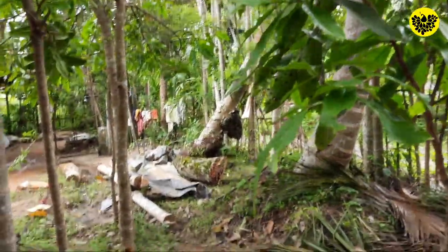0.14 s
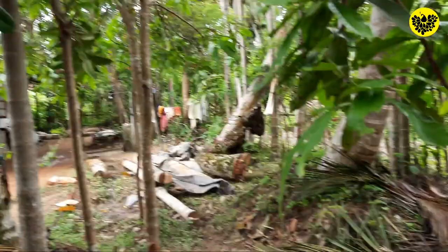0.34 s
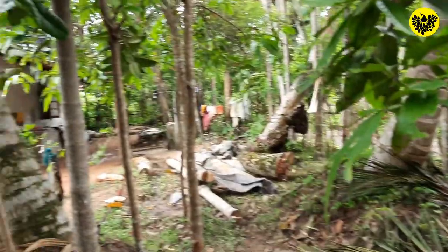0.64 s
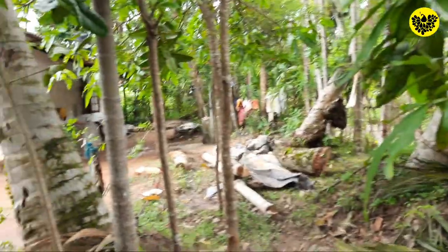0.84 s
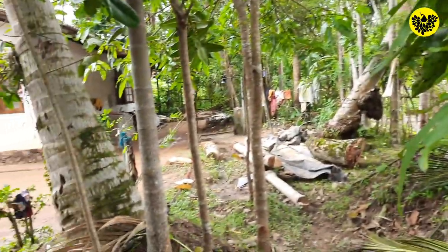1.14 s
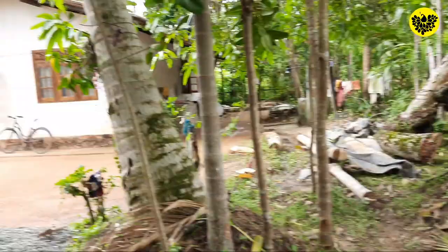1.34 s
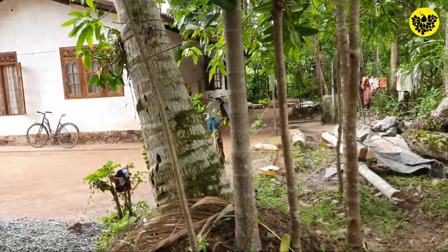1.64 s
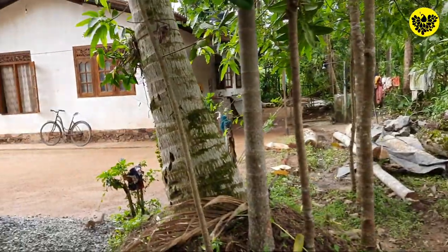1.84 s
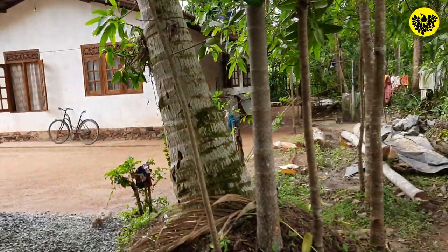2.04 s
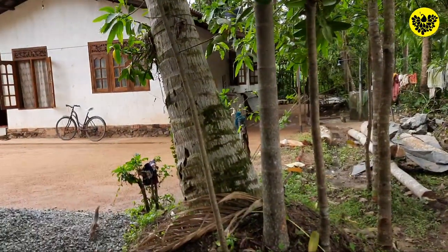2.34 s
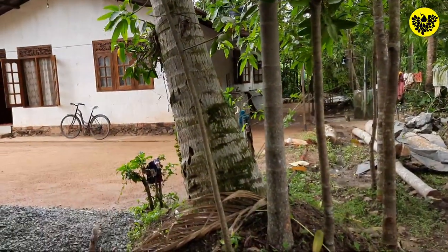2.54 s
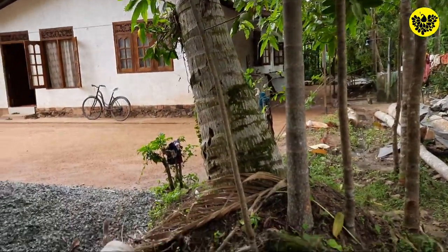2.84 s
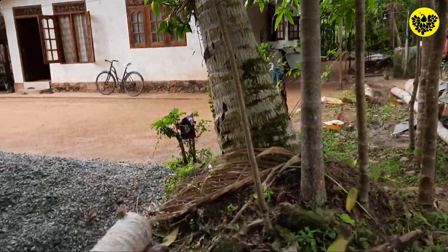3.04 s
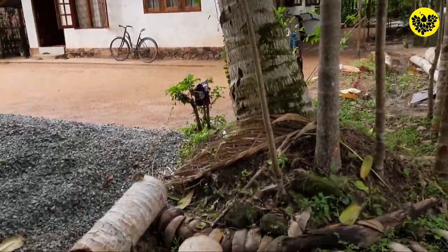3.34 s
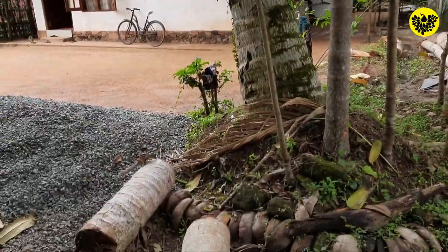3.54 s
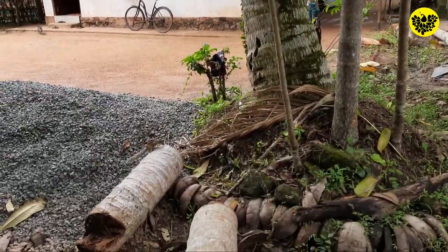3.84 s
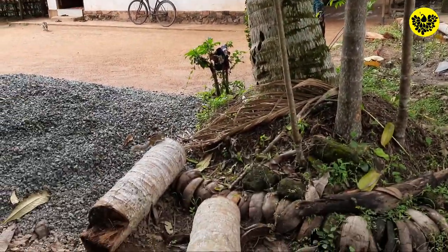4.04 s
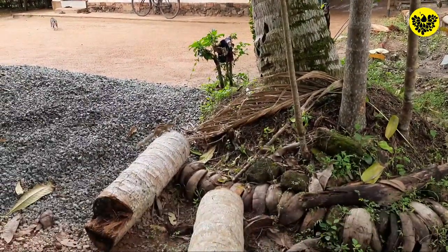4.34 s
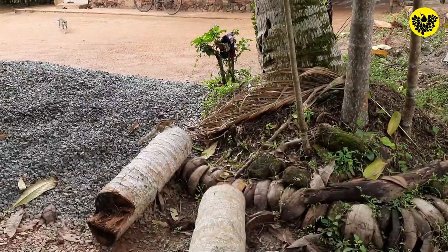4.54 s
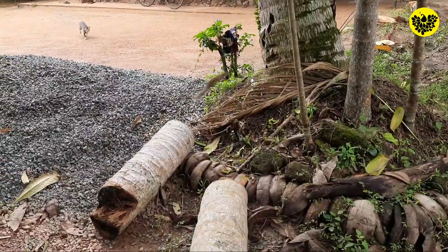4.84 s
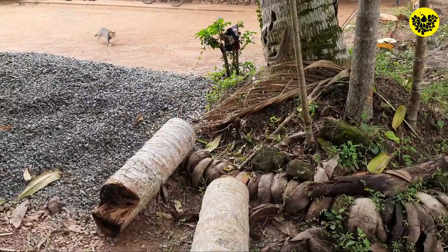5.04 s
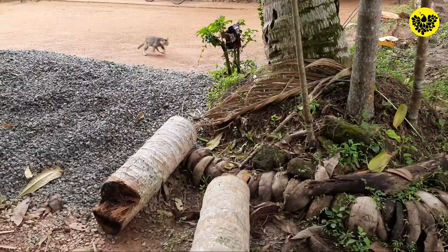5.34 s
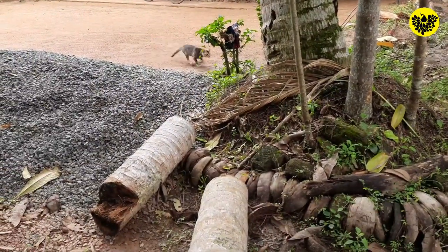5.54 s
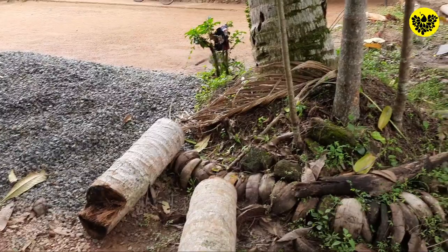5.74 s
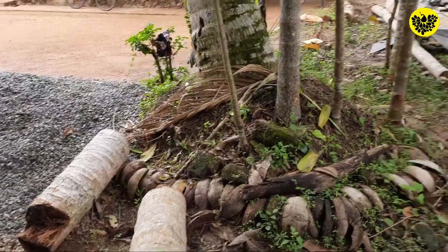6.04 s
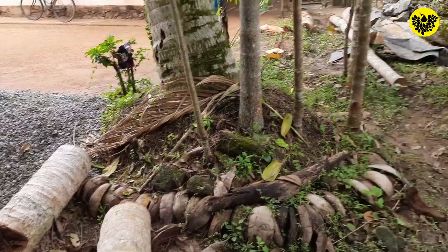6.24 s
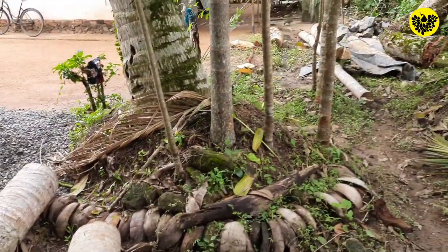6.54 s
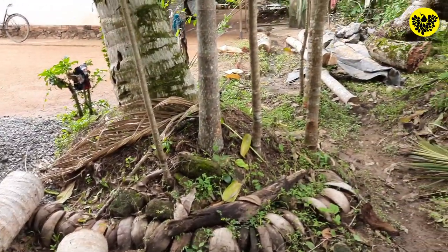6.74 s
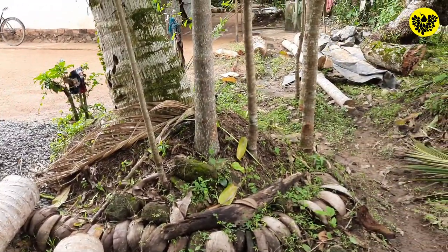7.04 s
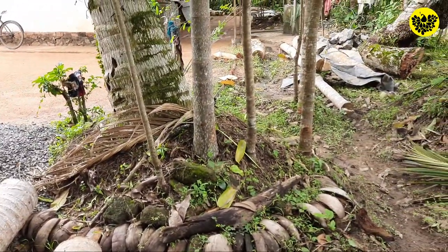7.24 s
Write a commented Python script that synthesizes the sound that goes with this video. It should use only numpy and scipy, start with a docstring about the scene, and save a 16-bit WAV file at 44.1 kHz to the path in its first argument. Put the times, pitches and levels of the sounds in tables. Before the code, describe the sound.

Faint wind, an insect whine and far birdsong, then a squirrel breaks into high-pitched chipping calls outdoors.

```python
"""A wooded yard: low wind rumble, insects, far birds, a row of soft chucks and a few bumps on the phone.
Then a palm squirrel breaks into shrill alarm chips; near the end its voice splits into two pitches.
Each chip is an arched whistle that snaps downward at its end and scatters off the house wall and trunks.
Birdsong is thin gliding sine tones; wind, leaves, insects and hoarse calls are shaped noise."""
import sys
import numpy as np
from scipy import signal
from scipy.fft import rfft, irfft
from scipy.io import wavfile
from scipy.ndimage import uniform_filter1d

SR = 44100
rng = np.random.default_rng(int(sys.argv[2]) if len(sys.argv) > 2 else 0)


def dump_mix(stems):
    """Bounce the given channels to the path in sys.argv[1] as a 16-bit WAV at rate SR."""
    frames = np.atleast_2d(stems).T  # one column per channel
    limited = np.clip(frames, -1, 1)  # hard clip at full scale
    pcm = np.round(limited * 32767).astype(np.int16)
    wavfile.write(sys.argv[1], SR, pcm)


N = 325899
T = np.arange(N) / SR


def undb(db):
    """Decibels to gain."""
    return 10 ** (np.asarray(db) / 20)


def unit(x):
    """Scale to rms 1."""
    return x / np.sqrt(np.mean(x ** 2))


def pan(x, db):
    """Place a sound by its left minus right level."""
    return x * undb(np.array([[db], [-db]]) / 2)


def add(out, s, x):
    """Mix x into out from time s."""
    i = int(s * SR)
    out[..., i:i + x.shape[-1]] += x[..., :max(N - i, 0)]


def walk(rate, size=N):
    """Smooth random wander with spread near 1."""
    k = max(int(SR / rate), 1)
    held = np.repeat(np.random.default_rng(rng.integers(2 ** 31)).standard_normal(size // k + 3), k)
    return 1.56 * uniform_filter1d(uniform_filter1d(held, k), k)[k:k + size]


def band(hz, width_hz, size=N):
    """Stereo noise in one resonance, rms 1."""
    f = np.fft.rfftfreq(size, 1 / SR)
    return unit(irfft(rfft(rng.standard_normal((2, size))) / (1 + ((f - hz) / width_hz) ** 2), size))


def on_log(f, points):
    """Read (Hz, value) points on a log-frequency axis."""
    hz, value = np.transpose(points)
    return np.interp(np.log(f + 1), np.log(hz), value)


def puff(rise_s):
    """A half-second envelope that peaks after rise_s and dies away."""
    t = T[:SR // 2] / rise_s
    return (t * np.exp(1 - t)) ** 2


def series(start_s, end_s, gap_s, growth_s):
    """Times of a run of calls whose gap changes steadily."""
    times, gap = [start_s], gap_s
    while times[-1] + gap < end_s:
        times.append(times[-1] + gap)
        gap = max(gap + growth_s, gap_s / 2)
    return times


def ports(x, lag_samples=1):
    """Sound from the side reaches the right microphone just after the left."""
    return np.array([x[0], np.roll(x[1], lag_samples)])


def yard(x, near_db, far_db, near_t60, far_t60, count=40, treble_hz=7000, treble_t60=0.62):
    """Echoes only: a quick scatter from ground, wall and trunks, then a soft tail from the foliage."""
    t = T[:SR]
    noise = rng.standard_normal((2, SR))
    # leaves and air give the treble its own decay time
    body = signal.sosfiltfilt(signal.butter(3, treble_hz, fs=SR, output="sos"), noise)
    tail = body * undb(-60 * t / far_t60) + (noise - body) * undb(-60 * t / treble_t60)
    tail *= 1 - np.exp(-t / 0.017)
    trunks = np.zeros((2, SR))
    for side in trunks:
        lag = .002 + .06 * (np.arange(count) + rng.random(count)) / count
        side[(lag * SR).astype(int)] = rng.choice([-1, 1], count) * undb(-60 * lag / near_t60)
    response = (undb(near_db) * unit(trunks) + undb(far_db) * unit(tail)) / np.sqrt(SR)
    return signal.fftconvolve(x, response, axes=1)[:, :N]


def wind(gain_db=8, rumble_hz=70, rumble_db=-54, flicker_db=1.27):
    """A bed of wind and far-off rumble: octave bands follow the breeze and each flickers on its own."""
    # tone of wind and distance: (frequency [Hz], relative level [dB])
    colour = [(25, -32.5), (58, -3), (120, 1.5), (165, -14.5), (363, -11), (700, -18.5), (1520, -21),
              (2300, -23), (3300, -33), (5730, -35.5), (7110, -28.5), (8140, -46), (11000, -48),
              (15000, -58)]
    # strength of the breeze: (time [s], relative level [dB])
    breeze = [(0, -53), (.6, -54.5), (4.95, -54), (5.8, -56.5), (6.8, -52.5), (7.39, -50)]
    # stereo image, centred bass and wide treble: (frequency [Hz], left-right correlation [-1..1])
    likeness = [(60, 0.96), (170, 0.98), (350, 0.8), (700, 0.42), (1400, -0.34), (3000, 0.025),
                (8000, -0.12)]
    f = np.fft.rfftfreq(N, 1 / SR)
    alike = np.clip(on_log(f, likeness), -1, 1)
    noise = rfft(rng.standard_normal((2, N))) * undb(on_log(f, colour))
    mid, side = noise * np.sqrt([1 + alike, 1 - alike])
    spectrum = np.array([mid + side, mid - side])
    octave = np.log2(np.maximum(f / 32, 1))
    layers = (irfft(spectrum * np.maximum(1 - abs(octave - k), 0), N) for k in range(10))
    bed = unit(sum(layer * undb(flicker_db * walk(10)) for layer in layers))
    breeze_db = np.interp(T, *np.transpose(breeze))
    rumble = undb(rumble_db) * band(rumble_hz, width_hz=4.6)[0]
    return pan(bed * undb(breeze_db + gain_db) + rumble, -2.54)


def cicadas():
    """A steady, narrow band of high hiss."""
    return undb(-66) * band(hz=7100, width_hz=170)


def insect_whine(width_hz=150, sag_hz_per_s=60, swell_db_per_s=3.5, release_s=0.15):
    """An insect's wavering whine swells and sinks in pitch until it stops."""
    # whines: (start [s], stop [s], first pitch [Hz], level at the stop [dB])
    whines = [(0, 3.22, 2480, -60), (4.3, 4.8, 2400, -63)]
    out = np.zeros((2, N))
    for start, stop, hz, db in whines:
        length = stop - start
        t = T[:int((length + release_s) * SR)]
        phase = 2 * np.pi * np.cumsum(hz - sag_hz_per_s * t) / SR
        whine = np.array([sum(walk(width_hz, len(t)) * wave(phase) for wave in (np.sin, np.cos))
                          for _ in range(2)])
        swell = undb(db + swell_db_per_s * (t - length))
        release = np.clip(1 - (t - length) / release_s, 0, 1)
        add(out, start, unit(whine * undb(1.2 * walk(15, len(t)))) * swell * release)
    return out


def leaves(centre_hz=9500, width_hz=3000, grain_db=3):
    """Faint grainy brushes of dry leaves."""
    # brushes: (time [s], level [dB], rise [s])
    rustles = [(0, -67, 0.044), (1.431, -71, .07), (2.28, -66, 0.0053), (3.25, -70, 0.038),
               (3.731, -72, .09)]
    out = np.zeros((2, N))
    for s, db, rise_s in rustles:
        hiss = band(centre_hz, width_hz, SR // 2)
        add(out, s, hiss * undb(db + grain_db * walk(500, SR // 2)) * puff(rise_s))
    return out


def birds(note_s=0.11, note_flutter=.012, whistle_flutter=0.0047, twitter_flutter=0.024):
    """Thin gliding whistles, twitters and repeated notes from deep among the trees."""
    # clear whistles: (start [s], length [s], first pitch [Hz], last pitch [Hz], relative level [dB])
    whistles = [(.69, 0.207, 3990, 3845, -57), (1.075, 0.165, 3440, 3467, -51),
                (1.33, 0.267, 2856, 2780, -59.5), (1.47, .12, 3250, 3150, -62.5), (3.6, 0.7, 628, 593, -66),
                (3.7, 0.13, 1116, 1150, -56.5), (5.358, 0.13, 3450, 3580, -52),
                (5.64, 0.072, 2916, 2890, -58)]
    # a small bird's fluttering twitters, same columns
    twitters = [(.76, 0.076, 5200, 5700, -62), (1.025, 0.042, 4940, 7540, -53),
                (1.058, 0.12, 6300, 5320, -56), (1.13, 0.093, 5200, 5600, -58),
                (1.22, 0.16, 6400, 6640, -58.5), (2.4, .1, 7030, 7400, -59.5),
                (4.15, .13, 7050, 6440, -52.5), (4.22, .05, 6370, 5400, -48)]
    # two birds pipe runs of one note, an octave apart:
    # (start [s], end [s], first gap [s], gap growth per note [s], pitch [Hz], relative level [dB])
    piping = [(0, 2.55, .215, .013, 4910, -62), (2.69, 4.2, .282, -.006, 4800, -65.5),
              (5.48, 5.85, .24, 0, 5020, -60), (.73, 1.35, .23, 0, 2470, -64),
              (5.55, 6.55, .18, .02, 2535, -52), (6.72, 7.39, .28, 0, 2475, -55)]
    notes = [(s, note_s, hz, hz, db) for *timing, hz, db in piping for s in series(*timing)]
    out = np.zeros((2, N))
    for song, flutter in (whistles, whistle_flutter), (twitters, twitter_flutter), (notes, note_flutter):
        for s, length, first, last, db in song:
            u = np.linspace(0, 1, int(length * SR))
            hz = (first + (last - first) * u) * (1 + flutter * walk(300, len(u)))
            swell = np.sqrt(2 * np.abs(np.sin(np.pi * u ** 0.52)))
            add(out, s, undb(db) * swell * np.sin(2 * np.pi * np.cumsum(hz) / SR))
    return out


def rasps(calls, hz, width_hz, rise_s, upper_hz=4400, upper_db=-15):
    """Unpitched bursts through one main throat resonance and a weak broad one."""
    out = np.zeros((2, N))
    for s, db in calls:
        throat = band(hz, width_hz, SR // 2) + undb(upper_db) * band(upper_hz, 760, SR // 2)
        add(out, s, undb(db) * throat * puff(rise_s))
    return out


def caw(start_s=.301, db=-55):
    """One far hoarse call with a soft attack."""
    return rasps([(start_s, db)], hz=1790, width_hz=280, rise_s=0.078)


def chucks(db=-49.5):
    """A run of soft chucks that quickens."""
    times = series(start_s=3.034, end_s=4.3, gap_s=.22, growth_s=-0.011)
    return rasps([(s, db) for s in times], hz=2230, width_hz=273, rise_s=0.0039)


def ticks():
    """Shrill ticks among the chips."""
    # ticks: (time [s], relative level [dB])
    hits = [(4.554, -47.5), (4.791, -33.5), (5.353, -50)]
    return rasps(hits, hz=5680, width_hz=320, rise_s=.004)


def aimed_away(x, above_hz=7500, lift_db=4):
    """The shrill overtones beam toward the wall and trees, so the echoes get more of them."""
    treble = signal.sosfiltfilt(signal.butter(2, above_hz, fs=SR, output="sos"), x)
    return x + (undb(lift_db) - 1) * treble


def chips(calls, bouts, beat_depth, beat_hz=1050, fall_s=.026, fall_db=-10, fall_bright_db=5.0):
    """Each whistle climbs to a crest and sags, then drops and turns rough as the throat lets go."""
    # overtones of a chip: (multiple of the pitch, relative level [dB], left minus right [dB])
    overtones = [(2, -17, -8), (3, -19.5, -5.5)]
    # the throat favours each overtone's crest and swallows the fall: (frequency [Hz], gain [dB])
    throat = [(3400, -18), (4300, -4.5), (5400, -1.5), (7200, -6.5), (8800, -1.5), (10000, -6.5),
              (11300, -16.5), (12800, -8.5), (14200, -2), (15300, -4), (16200, -23)]
    round_s, attack_s, attack_share = 0.01383, 0.0067, 0.36  # a longer climb slows the attack
    flutter_db, knee_db = 1.23, 1.56  # a last push of effort comes at the knee, just before the fall
    usual_db, overtone_growth = -20, 0.54  # overtones gain 0.54 dB for each dB of chip level
    out, t = np.zeros((2, N)), T[:SR // 5]
    for s, held, crest_s, crest_hz, db in calls:
        _, sag, depth, bright_db, side_db = [bout for bout in bouts if bout[0] <= s][-1]
        progress = np.clip(t / held, 0, 1)
        fall = np.clip((t - held) / fall_s, 0, 1)
        arch = crest_hz - sag * (np.hypot(np.minimum(t, held) - crest_s, round_s) - round_s)
        # the pitch starts clean, frays toward the knee and breaks up in the fall
        roughness = .008 * progress ** 4 + .033 * np.sqrt(fall)
        fray = .0024 * walk(300, len(t)) + roughness * walk(1200, len(t))
        hz = arch * (1 - depth * fall ** 1.308) * (1 + fray)
        phase = 2 * np.pi * np.cumsum(hz) / SR
        # two pitches in one throat beat and throw sidebands, widest on the overtones
        beat = beat_depth * progress * np.sin(2 * np.pi * np.cumsum(beat_hz * (1 + 8 * fray)) / SR)
        attack = np.sin(np.pi / 2 * np.clip(t / (attack_s + attack_share * crest_s), 0, 1)) ** 2
        level_db = db + knee_db * progress ** 8 + fall_db * fall + flutter_db * walk(127, len(t))
        envelope = attack * (1 - fall ** 6) * undb(level_db)
        voice = pan(np.sin(phase + beat) * undb(on_log(hz, throat)), side_db)
        edge_db = (overtone_growth - 1) * (db - usual_db) + fall_bright_db * fall
        for k, over_db, over_side_db in overtones:
            colour_db = on_log(k * hz, throat) + over_db + edge_db + (k - 1) * bright_db
            shimmer_db = 3 * walk(89, len(t))
            voice += pan(np.sin(k * phase + k * k * beat) * undb(colour_db + shimmer_db), over_side_db)
        add(out, s, np.sqrt(2) * envelope * voice)
    return out


def squirrel():
    """Two bouts of alarm chips; in the second, a higher, beating pitch splits off."""
    # alarm chips: (start [s], hold [s], time to crest [s], crest pitch [Hz], relative level [dB])
    alarm = [ (4.248, 0.07, 0.046, 4770, -29.5), (4.554, .05, .003, 4730, -20),
             (4.645, 0.028, 0.0042, 4634, -21.5), (4.668, 0.077, 0.073, 5100, -18),
             (4.743, .047, 0.0304, 5240, -16), (4.792, 0.064, 0, 4974, -25.5),
             (4.828, .053, .015, 4775, -18.5), (4.932, 0.029, .01, 4794, -19.5),
             (5.019, .073, 0.0036, 4928, -15), (5.115, 0.069, .046, 5150, -14.5),
             (5.255, 0.038, 0.00047, 4607, -24.5), (5.919, 0.076, 0.0019, 4895, -23.5),
             (6.060, 0.023, 0, 4880, -26), (6.238, .12, .05, 4954, -24), (6.402, .046, .012, 4977, -22.5),
             (6.435, 0.036, 0, 4655, -19.5), (6.545, 0.1, 0.036, 4784, -18.5),
             (6.726, 0.09, 0.037, 4771, -17.5), (6.950, .032, 0.0032, 4435, -27.5),
             (7.088, 0.065, 0.021, 4534, -22), (7.226, .102, .052, 4820, -21)]
    # each bout's manner: (from [s], arch slope [Hz/s], fall depth [share of pitch],
    # brightness per overtone [dB], left minus right [dB])
    alarm_bouts = [(4.0, 3980, .125, 1.4, 2.2), (5.7, 6460, .25, -1.16, 0.5)]
    # the higher second pitch, same columns as the chips
    shrill = [(6.058, 0.034, 0.011, 6460, -34.5), (6.899, 0.068, 0.026, 5556, -22),
              (7.050, 0.068, 0.029, 5584, -23)]
    # its manner, first a bare squeak, then a bright cry; same columns as the bouts
    shrill_bouts = [(5.7, 2040, 0.031, -18, 0.72), (6.7, 3040, 0.086, 2.5, 1.3)]
    return chips(alarm, alarm_bouts, beat_depth=0) + chips(shrill, shrill_bouts, beat_depth=0.21)


def scene():
    """The squirrel and hoarse voices come direct and with echoes; the far birds are mostly echo."""
    alarm = undb(-5.5) * squirrel()
    hoarse = caw() + chucks() + ticks()
    song = birds()
    voices = ports(alarm) + yard(aimed_away(alarm), near_db=0, far_db=-5, near_t60=.17, far_t60=.62)
    voices += undb(1) * ports(hoarse) + yard(hoarse, near_db=4, far_db=-11, near_t60=.052, far_t60=.17)
    far_birds = undb(-7.5) * song + yard(song, near_db=-2, far_db=-3, near_t60=.12, far_t60=1.0)
    return voices + far_birds + bumps() + leaves() + cicadas() + insect_whine() + wind()


def record(dry, top_hz=15450):
    """The phone cuts the top."""
    return signal.sosfilt(signal.ellip(10, .2, 80, top_hz, fs=SR, output="sos"), dry)


def bumps(ring_s=0.003, click_s=0.006):
    """Fingers knock the phone's case: a dead thud and a small click."""
    # knocks: (time [s], relative level [dB], pitch [Hz], left minus right [dB], click over thud [dB])
    knocks = [(1.628, -29, 115, 7, -9), (2.677, -33.5, 296, 20, -36), (2.692, -33, 286, 23, -37),
              (2.749, -27.5, 250, 22, -36)]
    out, t = np.zeros((2, N)), T[:SR // 10]
    for s, db, hz, side_db, click_db in knocks:
        thud = -np.sin(2 * np.pi * hz * t) * t / ring_s * np.exp(2 - 2 * t / ring_s)
        click = undb(click_db) * rng.standard_normal(len(t)) * np.exp(-t / click_s)
        add(out, s, pan(undb(db) * (thud + uniform_filter1d(click, size=3)), side_db) / 2)
    return out


dry = scene()
out = record(dry)
dump_mix(out)
```